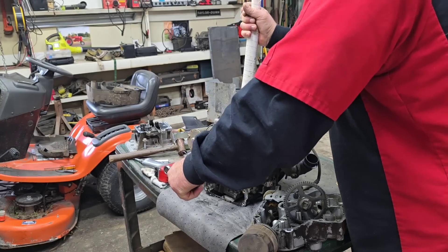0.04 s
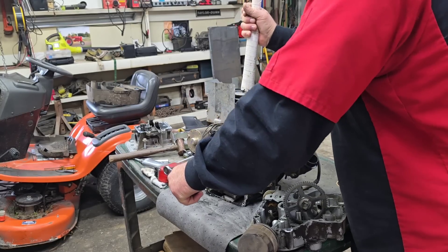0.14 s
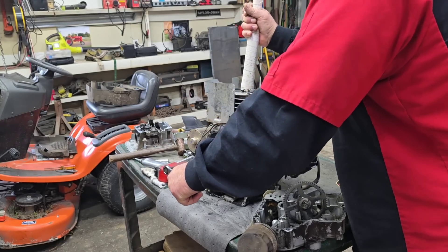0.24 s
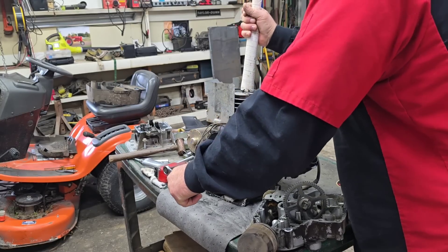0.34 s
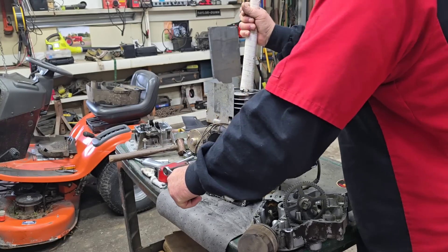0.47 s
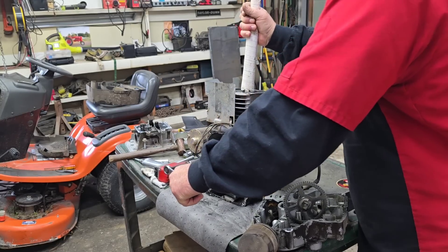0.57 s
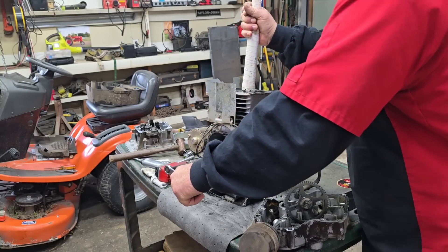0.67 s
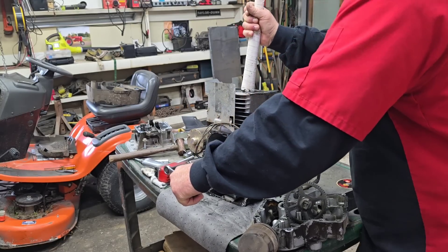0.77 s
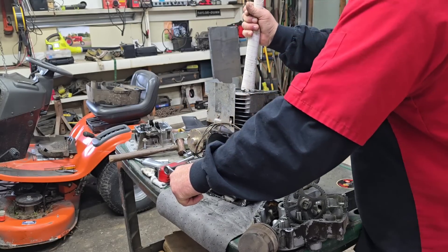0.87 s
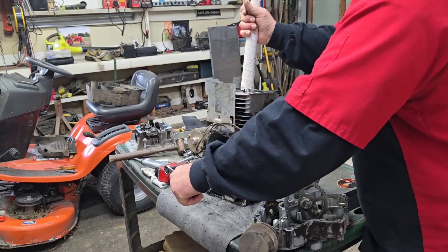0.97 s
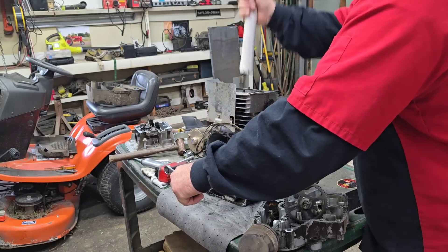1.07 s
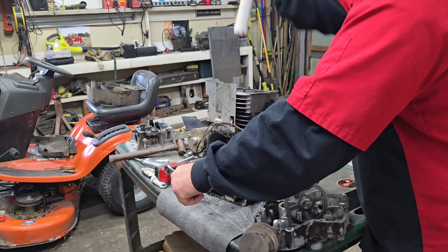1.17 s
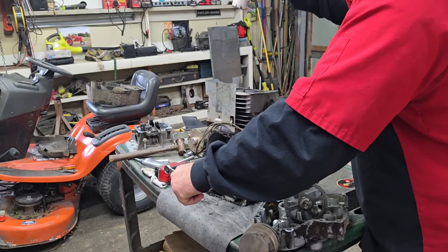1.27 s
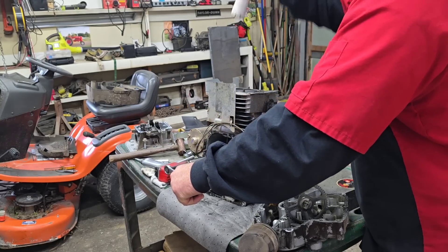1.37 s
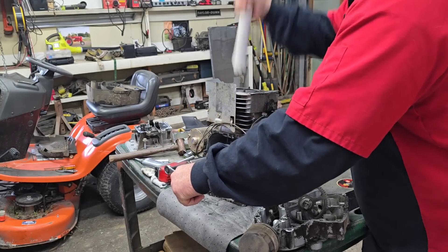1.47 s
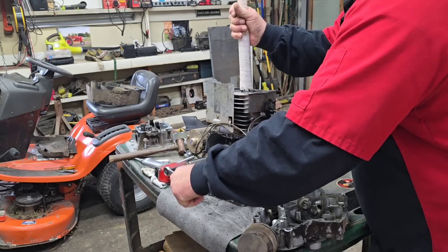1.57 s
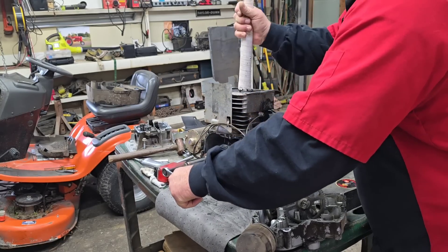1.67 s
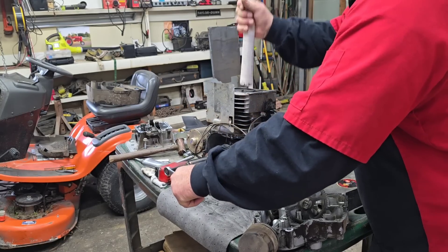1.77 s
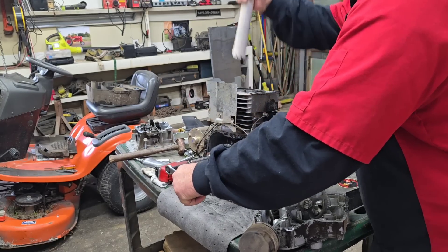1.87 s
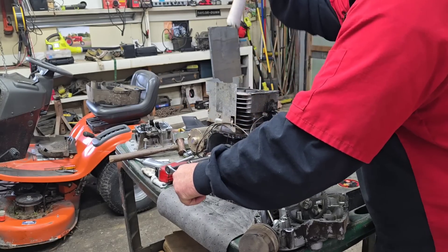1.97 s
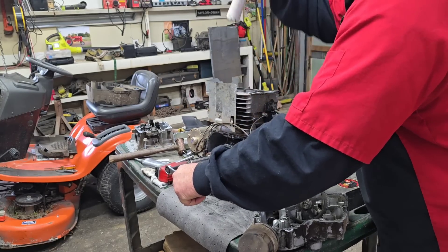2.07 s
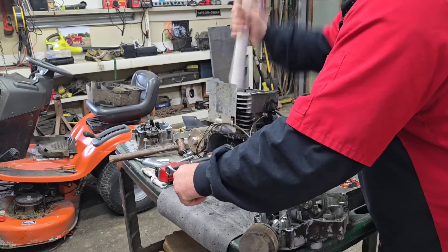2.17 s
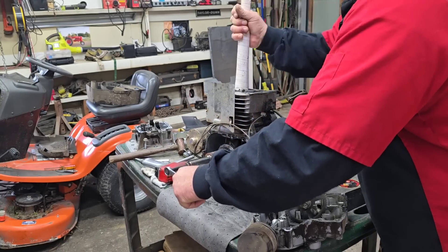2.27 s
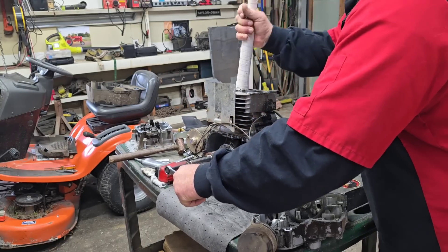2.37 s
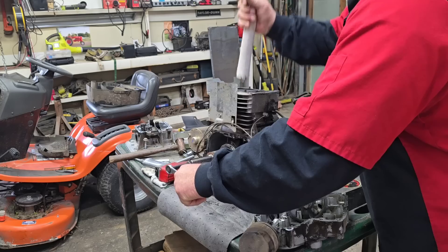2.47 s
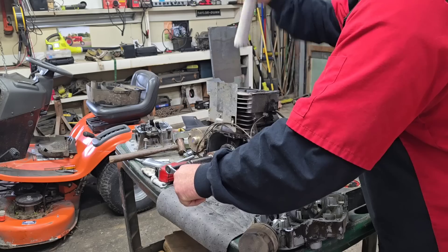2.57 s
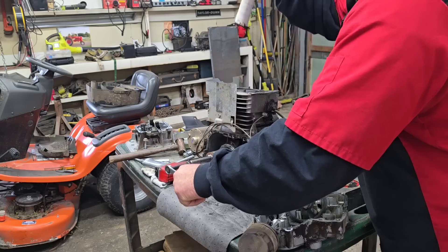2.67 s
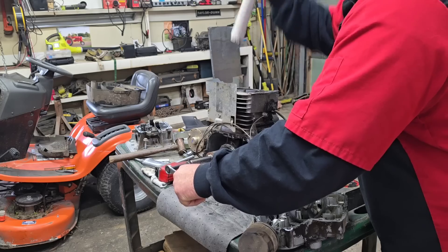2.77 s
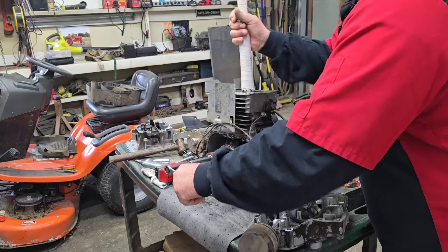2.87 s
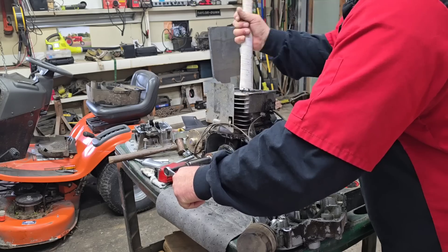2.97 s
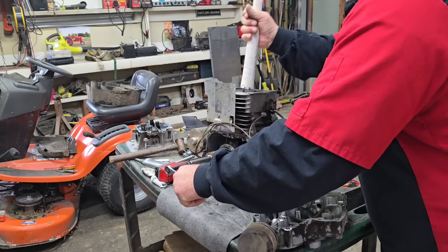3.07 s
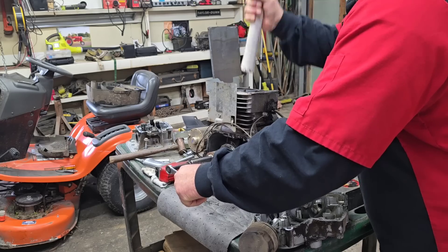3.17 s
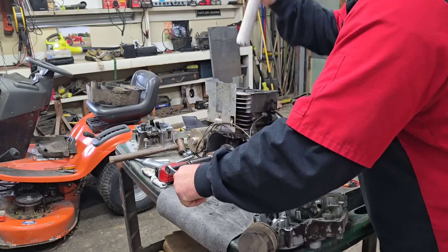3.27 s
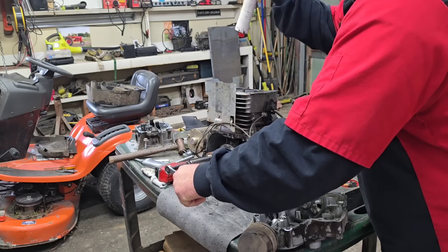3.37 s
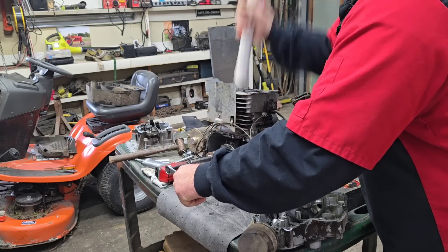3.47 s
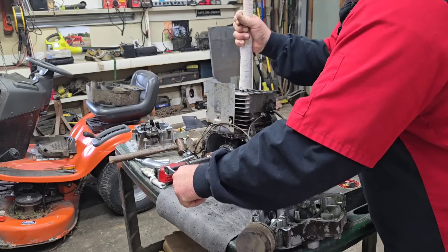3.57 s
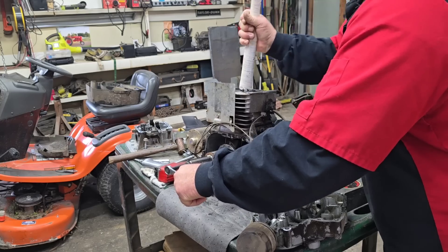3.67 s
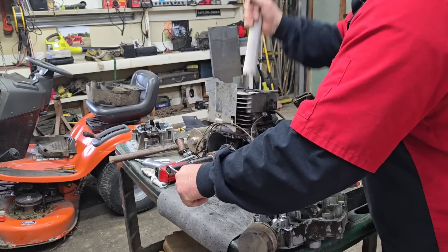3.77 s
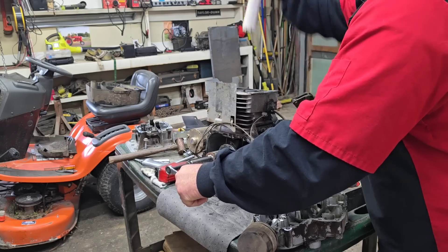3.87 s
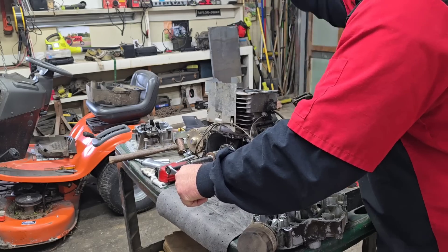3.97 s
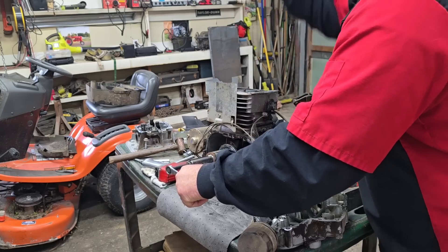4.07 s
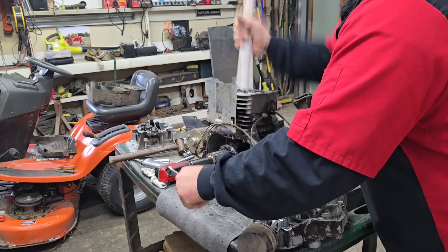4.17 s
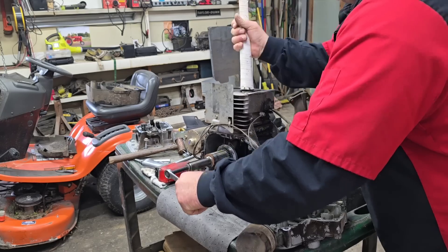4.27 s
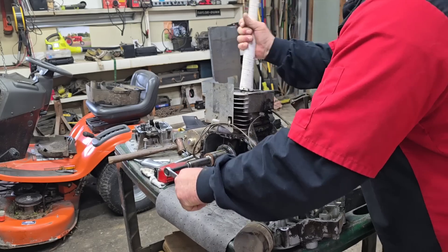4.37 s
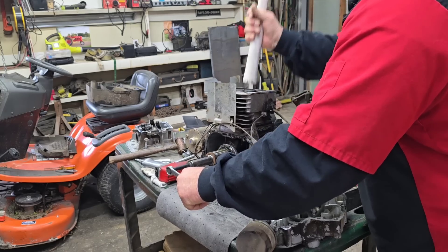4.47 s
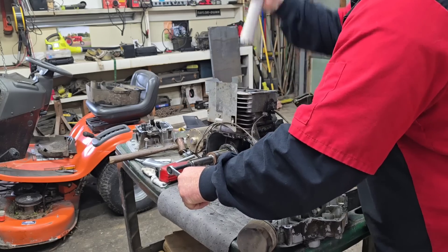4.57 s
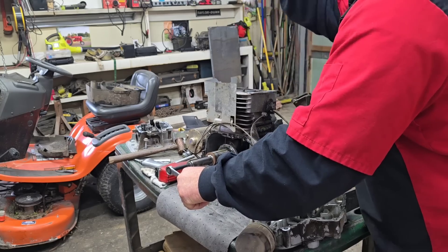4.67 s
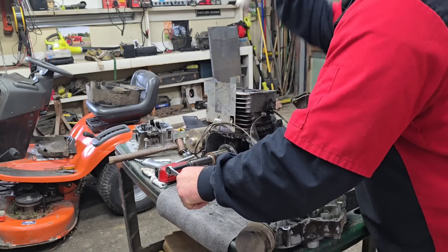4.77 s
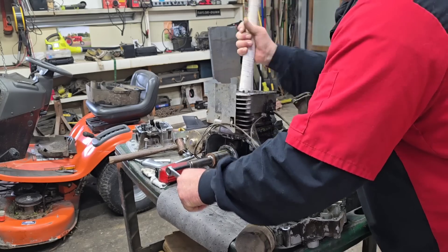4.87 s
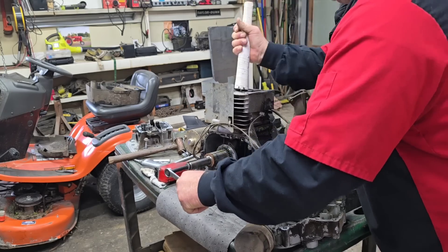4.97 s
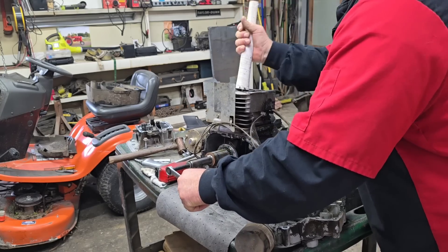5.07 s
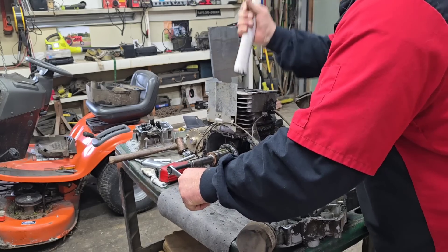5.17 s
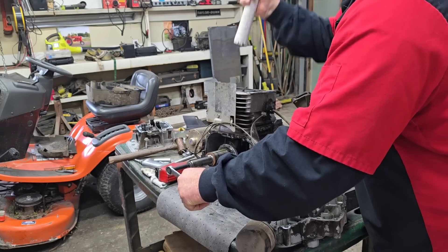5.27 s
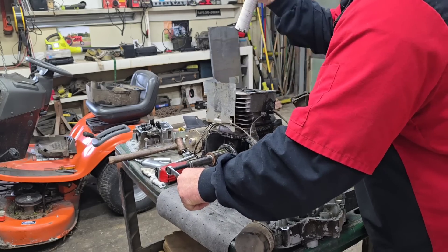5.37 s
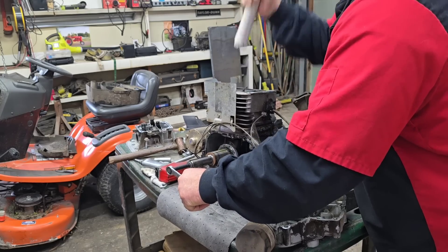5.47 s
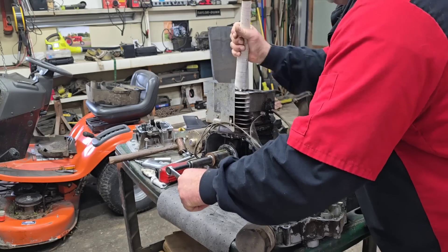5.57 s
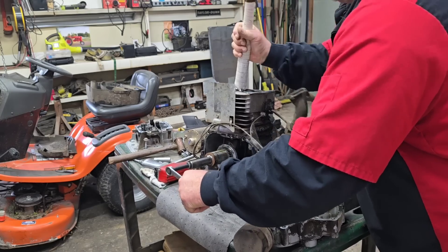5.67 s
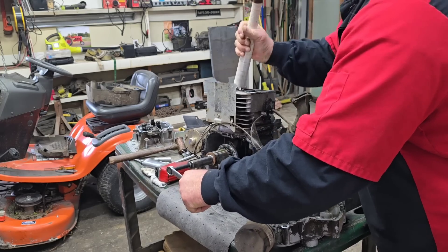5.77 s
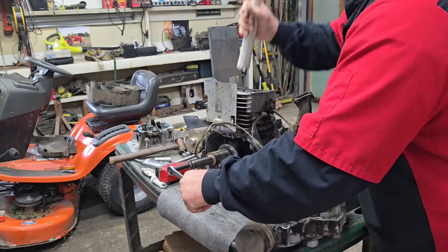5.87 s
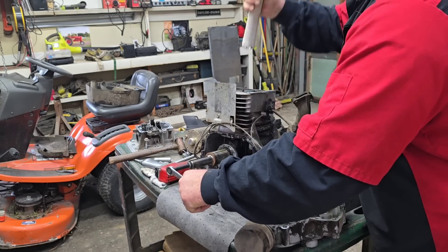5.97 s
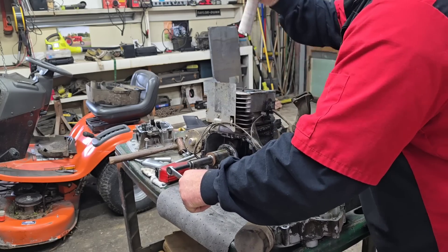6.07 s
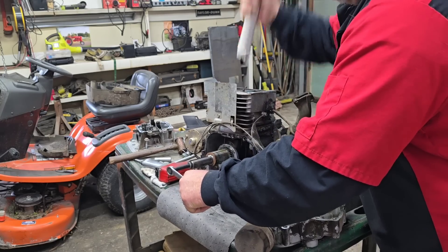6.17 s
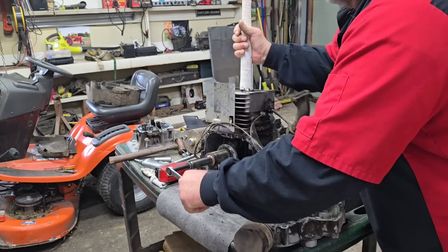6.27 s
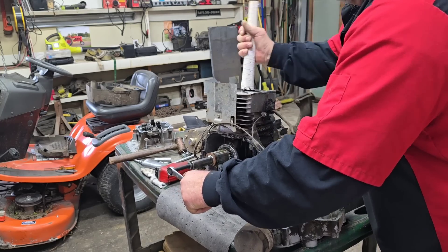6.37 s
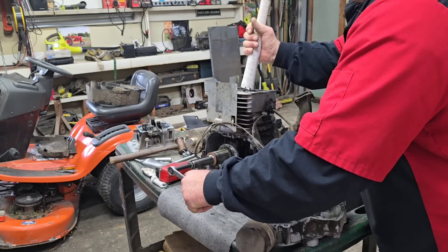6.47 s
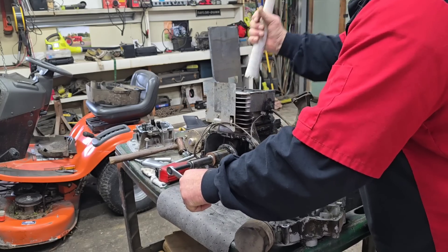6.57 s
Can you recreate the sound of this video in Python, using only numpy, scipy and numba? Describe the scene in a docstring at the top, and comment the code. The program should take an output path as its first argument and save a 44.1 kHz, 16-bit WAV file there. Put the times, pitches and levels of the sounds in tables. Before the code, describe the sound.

Quiet workshop air, cloth movement and a few light taps come first. From about one and a half seconds, eight heavy blows of wood on a finned metal cylinder follow at a steady pace. The first is woodier and duller; later ones clatter with loose parts and piston slap, the last being the most metallic. Small steel clinks and buzzes and muffled engine rocking fill the gaps. The close microphone squashes peaks and trims the room echo.

```python
"""Freeing a stuck piston

A wooden handle is rammed eight times onto the stuck piston of a small engine lying on a workshop bench.
Each blow is a noise crack with its room echo, damped modes of wood, cylinder and bench, and rattling loose parts.
Around the blows the engine rocks in dull thumps, a spanner clinks, small steel parts buzz and a sleeve rustles
as shaped noise; a close microphone's limiter flattens the blows and a noise suppressor shortens their tails."""
import sys
import numpy as np
from scipy import signal
from scipy.fft import rfft, irfft
from scipy.io import wavfile
from scipy.ndimage import uniform_filter1d, minimum_filter1d
from numba import njit

SR = 44100
rng = np.random.default_rng(int(sys.argv[2]) if len(sys.argv) > 2 else 0)


def to_wav(s):
    """Save 16-bit WAV."""
    ch = np.atleast_2d(s).T  # columns
    pcm = np.round(np.clip(ch, -1, 1) * 32767)  # PCM
    wavfile.write(sys.argv[1], SR, pcm.astype(np.int16))


N = 292383
AGE = np.arange(SR) / SR  # time since a hit, s

# blows on the piston; boom, metal and slap are relative to the force:
# (t/s, force/dB, bench boom/dB, ring and chatter of the metal/dB, piston slap/dB, slap delay/s)
BLOWS = [(1.5253, -7, 5.5, -7, -4.5, .012), (2.2100, -8, 8.5, 0, 3.5, 0.0072),
         (2.8665, -8, 6.5, 2.5, 7.5, 0.01), (3.5166, -9, 7, -0.5, 5, .011), (4.1901, -2, 3, 1, 8, 0.024),
         (4.8879, -4, 7.5, -6.5, 8, 0.0041), (5.5587, -11.5, 7, 0.5, 2, 0.014),
         (6.2390, -8, 1, 8, 10, .0033)]
# bench and crankcase, ringing freely: (f/Hz, level/dB, t60/s)
BENCH_MODES = [(79, -18.5, 0.48), (99, -17, 0.17), (129.2, 0.5, 0.37), (151, -8, 0.38), (163, -7.5, 0.41),
               (224.6, 5.5, 0.29), (241.8, 2, 0.26), (260.7, -12, 0.38), (291.8, -2.5, 0.4),
               (320.7, -7.5, 0.42), (348, -0.5, 0.25), (379.8, -4.5, 0.35), (408, -3, 0.26),
               (436.3, -11, 0.35)]


def undb(db):
    """Decibels to gain."""
    return 10 ** (np.asarray(db) / 20)


def fade(t60):
    """Exponential decay that loses 60 dB in t60 seconds."""
    return np.exp(-np.log(1000) * AGE / t60)


def swell(rise_s):
    """Build-up from zero as a vibration spreads."""
    return 1 - np.exp(-AGE / rise_s)


def uneven(depth_db, step_s):
    """Gain that wanders at random from one short step to the next."""
    steps = rng.standard_normal(2048)
    wander = np.interp(AGE / step_s, np.arange(len(steps)), steps)
    return undb(depth_db * wander)


def at_hz(points, hz):
    """Read (f/Hz, value) points on a log-frequency axis."""
    f, value = np.transpose(points)
    return np.interp(np.log(np.maximum(hz, 1)), np.log(f), value)


def noise(spectrum, size=SR):
    """Noise of rms 1 with the given colour."""
    hz = np.fft.rfftfreq(size, 1 / SR)
    white = rfft(rng.standard_normal(size))
    x = irfft(white * undb(at_hz(spectrum, hz)), size)
    return x / x.std()


def cluster(hz, width_hz):
    """Many close modes around one pitch, beating against each other: narrow-band noise of rms 1."""
    f = np.fft.rfftfreq(SR, 1 / SR)
    white = rfft(rng.standard_normal(SR))
    x = irfft(white / (1 + (2 * (f - hz) / width_hz) ** 2), SR)
    return x / x.std()


def ring(modes, detune=0):
    """Damped modes, each with random phase and, if detune is set, slightly random pitch."""
    out = np.zeros(SR)
    for hz, db, t60 in modes:
        pitch_shift, cycles = rng.standard_normal(2)
        tone = np.sin(2 * np.pi * (hz * (1 + detune * pitch_shift) * AGE + cycles))
        out += undb(db) * fade(t60) * tone
    return out


def through(x, resonances):
    """Lift a sound around each (f/Hz, width/Hz, lift/dB) resonance."""
    hz = np.fft.rfftfreq(len(x), 1 / SR)
    power = np.ones(len(hz))
    for centre, width, db in resonances:
        power += (undb(db) ** 2 - 1) / (1 + (2 * (hz - centre) / width) ** 2)
    return irfft(rfft(x) * np.sqrt(power), len(x))


def room(x, build_s):
    """Diffuse echo of the cluttered workshop, of unit energy, each octave band decaying at its own rate."""
    # decay of the workshop: (f/Hz, t60/s)
    room_t60 = [(70, 0.24), (200, 0.4), (450, 0.33), (900, 0.37), (2500, 0.34), (5500, 0.35), (9000, 0.27),
                (15000, 0.15)]
    hz = np.fft.rfftfreq(SR, 1 / SR)
    centres = 62.5 * 2. ** np.arange(9)
    white = rfft(rng.standard_normal(SR))
    tail = np.zeros(SR)
    for centre, share in zip(centres, np.eye(len(centres))):
        band = irfft(white * at_hz(np.c_[centres, share], hz), SR)
        tail += band * fade(at_hz(room_t60, centre))
    tail *= swell(build_s)
    return signal.fftconvolve(x, tail / np.sqrt(np.sum(tail ** 2)))[:len(x)]


def add(track, s, sound):
    """Mix a sound into the track at time s."""
    start = int(s * SR)
    track[start:start + len(sound)] += sound[:N - start]


def shop_air():
    """Steady coloured noise of the workshop air."""
    # air of the workshop: (f/Hz, density/dB)
    air_spectrum = [(25, -35), (60, -11), (110, -8), (220, -3.5), (330, -7), (550, -13.5), (1000, -18.5),
                    (2700, -28.5), (5500, -30.5), (8000, -40.5), (16000, -59)]
    return undb(-55.5) * noise(air_spectrum, size=N)


def sleeve():
    """The arm moves in its sleeve: cloth swishes through air and rubs on cloth, unevenly where it folds."""
    # moves of the arm: (start/s, length/s, level/dB, share of cloth rubbing on cloth 0-1)
    arm_moves = [(0, .24, -48.5, 0.88), (0.219, .22, -45, 0.7), (0.439, .27, -49, 0.16), (.83, 1, -51.5, 0),
                 (1.948, .2, -54, .05), (2.452, 0.22, -51.5, 0.1), (4.445, 0.47, -49.5, 0.09),
                 (5.097, 0.3, -50, 0.18), (6.117, .12, -56, 0.4)]
    # cloth rubbing on cloth: (f/Hz, density/dB)
    rub_spectrum = [(300, -7.5), (700, -3.5), (1050, -7.5), (1400, -0.5), (1900, -7.5), (2450, -6),
                    (3100, -11), (6300, -15.5), (9000, -27.5), (14000, -42.5)]
    # cloth swishing: (f/Hz, density/dB)
    swish_spectrum = [(60, -13.5), (200, -2.5), (350, -8), (600, -15.5), (1000, -16), (2700, -27.5),
                      (5000, -18.5), (8000, -32.5), (16000, -60.5)]
    rise_s, fall_s = 0.036, 0.11
    out = np.zeros(N)
    for s, length_s, db, rub in arm_moves:
        cloth = np.sqrt(rub) * noise(rub_spectrum) + np.sqrt(1 - rub) * noise(swish_spectrum)
        # a move starts and stops softly
        motion = np.clip(np.minimum(AGE / rise_s, 1 - (AGE - length_s) / fall_s), 0, 1)
        folds = uneven(depth_db=2.5, step_s=0.062)
        add(out, s, undb(db) * cloth * motion * folds)
    return out


def steel_pings():
    """Small steel parts buzz around one note when jolted."""
    # buzzing parts: (t/s, f/Hz, width/Hz, level/dB, t60/s)
    pings = [(2.098, 12740, 165.7, -38.5, 0.11), (2.099, 2068, 60.4, -41.5, 0.24),
             (2.183, 2099, 88.1, -37, 0.23), (2.306, 7580, 270, -25, 0.26), (2.870, 6500, 24.73, -27, 0.48),
             (2.873, 7400, 60, -27.5, 0.26), (5.562, 6590, 24.4, -27, 0.54), (6.244, 5340, 200, -0.5, 0.3)]
    out = np.zeros(N)
    for s, hz, width_hz, db, t60 in pings:
        add(out, s, undb(db) * cluster(hz, width_hz) * fade(t60) * swell(0.0024))
    return out


def light_taps():
    """The handle touches the cylinder lightly: soft bursts of dull noise."""
    # light touches: (t/s, level/dB, t60/s)
    taps = [(0.231, -26.5, 0.035), (.570, -30, 0.021), (.828, -39, .4), (2.762, -48, .06),
            (3.935, -44.5, 0.049), (4.778, -37.5, 0.038), (6.011, -38.5, 0.062)]
    # wood on fins: (f/Hz, density/dB)
    tap_spectrum = [(60, -8.5), (250, 1), (550, 0.5), (1000, -6.5), (2500, -14.5), (5500, -15.5),
                    (9000, -36), (15000, -45.5)]
    out = np.zeros(N)
    for s, db, t60 in taps:
        add(out, s, undb(db) * noise(tap_spectrum) * fade(t60) * swell(0.0023))
    return out


def spanner_clinks():
    """The spanner clinks on the crankshaft: a short noise contact coloured by its modes, with their ring."""
    # clinks: (t/s, level/dB, lift of the low modes/dB, top edge f/Hz)
    clinks = [(2.0180, -22.5, -13.5, 8900), (2.0673, -28, -10, 9100), (2.101, -19, 3, 9350),
              (5.056, -3.5, -2, 4000), (5.0800, -11.5, -2.5, 4080)]
    # spanner, before the lift of its low modes: (f/Hz, level/dB, t60/s)
    spanner_modes = [(990, -7.5, 0.038), (1270, -9, 0.091), (1750, -22.5, .12), (2130, -10.5, 0.061),
                     (2480, -13, 0.07), (2870, -19.5, 0.17), (4970, -15.5, 0.12), (4870, -22.5, .22),
                     (5860, -25, 0.1), (6700, -13.5, 0.14), (7930, -13.5, 0.097), (12630, -21.5, .14)]
    # steel touching steel: (f/Hz, density/dB)
    contact_spectrum = [(300, -12), (950, -8), (2100, -0.5), (3000, -2.5), (5200, 4.5), (7500, -9),
                        (10000, -13), (15000, -40.5)]
    out = np.zeros(N)
    for s, db, body_db, edge_hz in clinks:
        modes = [(hz, level + body_db / (1 + (hz / 1500) ** 4), t60) for hz, level, t60 in spanner_modes]
        # while the steel is still in contact its modes are broad
        broad = [(hz, 140, max(level + 18, 0)) for hz, level, _ in modes]
        contact = through(noise(contact_spectrum), broad) * fade(.045)
        clink = undb(-2) * contact + undb(-7.5) * ring(modes, detune=0.00059)
        # each clink has its own top edge: a lower one sounds duller
        top_edge = signal.butter(2, edge_hz, fs=SR, output="sos")
        add(out, s, undb(db) * signal.sosfilt(top_edge, clink))
    return out


def small_contacts():
    """Clinks and taps with their room echo, and the buzzes dry."""
    touches = spanner_clinks() + light_taps()
    return touches + undb(-7.0) * room(touches, build_s=0.0018) + steel_pings()


def thump(t60):
    """The crankcase meets the padded bench dully and sets it humming; one decay damps it all."""
    # crankcase on its padding: (f/Hz, level/dB)
    settle_modes = [(128, -6), (185, -3), (292, -5), (390, -11)]
    # dull impact: (f/Hz, density/dB)
    thump_spectrum = [(30, -29.5), (70, -21), (130, 8), (300, -3), (450, -14), (750, -20), (1500, -42),
                      (6000, -58)]
    settle = sum(undb(db) * np.sin(2 * np.pi * hz * AGE) for hz, db in settle_modes)
    impact = undb(-1) * noise(thump_spectrum)
    hum = undb(-12.5) * ring(BENCH_MODES)
    padding = swell(.004)
    return (settle + impact + hum) * fade(t60) * padding


def rocking(count=3):
    """The engine lands just after every blow; at times, also before the first, it rocks in dying bumps."""
    # rocking to and fro: (t/s, level/dB, loss per bump/dB)
    rocks = [(0.262, -39, 12), (.352, -36.5, 5), (.569, -21, 12.5), (1.858, -23, 3.5), (2.496, -24.5, 2.5),
             (3.125, -31, 16), (4.419, -11.5, 5.5), (4.719, -23.5, 19), (5.164, -26.5, 13.5),
             (5.809, -31, 24)]
    drop_delay_s, drop_db = .094, -5  # landing after the blow, level against its boom
    gap_s, far_side_db = .051, -3.5  # bumps fall on near side, far side and near side again
    out = np.zeros(N)
    for s, force_db, boom_db, *_ in BLOWS:
        add(out, s + drop_delay_s, undb(force_db + boom_db + drop_db) * thump(t60=0.13))
    for s, db, loss_db in rocks:
        for bump in range(count):
            bump_db = db - bump * loss_db + bump % 2 * far_side_db
            add(out, s + bump * gap_s, undb(bump_db) * thump(t60=0.11))
    return out + undb(-22.5) * room(out, build_s=0.0067)


def blows():
    """Each blow cracks, rings wood, cylinder and bench, sets loose parts chattering and slaps the piston."""
    # wooden handle on the piston crown: (f/Hz, level/dB, t60/s)
    wood_modes = [(640, -4, 0.19), (631, 2.5, 0.3), (680, 3.5, 0.31), (689, 3, 0.19), (711, 7.5, 0.29),
                  (741, 3.5, 0.27), (737, -7.5, 0.29)]
    # finned cylinder: (f/Hz, level/dB, t60/s)
    cylinder_modes = [(1555, -6, .40), (1637, -5, .40), (2401, -7, .42), (3957, -10, .40), (4017, -8, .42),
                      (4547, -8, .40), (4653, -12, .40), (5270, -1, .36), (5345, -7, .36), (5477, -5, .36),
                      (5675, -11, .38)]
    # clusters of fin resonances that colour chatter and slap: (f/Hz, width/Hz, lift/dB)
    fin_clusters = [(1550, 57, 10), (2360, 260, 5.5), (3850, 79, 5), (3980, 350, 4.5), (4600, 150, 8.5),
                    (5450, 110, 7.5), (5120, 44, 10), (6900, 48, 2), (7600, 19, 7.5), (8580, 27, 8)]
    # crack of the impact: (f/Hz, density/dB)
    crack_spectrum = [(30, -36.5), (60, -15), (100, -2.5), (200, -4.5), (400, 1.5), (520, 1.5), (720, 4),
                      (900, -5), (1500, -4.5), (2500, -15.5), (5500, -15.5), (8000, -29.5), (15500, -46.5)]
    # loose parts, before the fins: (f/Hz, density/dB)
    chatter_spectrum = [(200, -28), (800, -7.5), (1500, -1.5), (2300, -0.5), (3000, 2), (4600, 0),
                        (6300, 1.5), (8000, -11), (11000, -21), (15500, -32.5)]
    # piston slapping in its bore, before the fins: (f/Hz, density/dB)
    slap_spectrum = [(200, -19), (800, -7), (1500, -3.5), (3000, -2.5), (5500, -0.5), (8000, -8.5),
                     (11000, -11.5), (15500, -20)]
    out = np.zeros(N)
    for s, force_db, boom_db, metal_db, slap_db, slap_delay_s in BLOWS:
        crack = noise(crack_spectrum) * fade(0.048)
        echo = undb(15) * room(crack, build_s=0.01)
        # the heavy bench takes up the motion late
        boom = undb(boom_db) * ring(BENCH_MODES, detune=.006) * swell(0.024)
        knock = undb(-1.5) * ring(wood_modes, detune=.008) * swell(0.0038)
        cylinder = undb(-4.5) * ring(cylinder_modes, detune=.0006) * swell(.008)
        # loose parts rattle in uneven spurts
        rattle = noise(chatter_spectrum) * uneven(depth_db=2, step_s=.004)
        chatter = undb(1) * through(rattle, fin_clusters) * fade(.37) * swell(0.0023)
        metal = undb(metal_db) * (cylinder + chatter)
        add(out, s, undb(force_db) * (undb(3) * crack + echo + boom + knock + metal))
        # a moment later the piston takes up the play of its rod, metal on metal
        slap = through(noise(slap_spectrum), fin_clusters) * fade(0.081) * swell(0.0022)
        add(out, s + slap_delay_s, undb(force_db + slap_db) * slap)
    return out


def scene():
    """Everything at the bench, heard by one microphone."""
    return (shop_air() + sleeve() + small_contacts() + rocking() + blows())[None]


@njit
def follow(x, release):
    """Peak follower: jumps up at once, sinks slowly by the factor release per sample."""
    out, e = np.empty(len(x)), 0.
    for i in range(len(x)):
        e = max(x[i], e * release)
        out[i] = e
    return out


def limiter(x, ceiling_db, release_s):
    """Look-ahead peak limiter: the gain dips smoothly just before each peak."""
    window = 65  # samples, centred
    peak = follow(np.abs(x), np.exp(-1 / (release_s * SR)))
    gain = np.minimum(1, undb(ceiling_db) / (peak + 1e-9))
    return x * uniform_filter1d(minimum_filter1d(gain, window), window)


def suppress(x, depth_db, steepness):
    """Noise suppressor: the further a band sinks below its threshold, the more it is turned down."""
    # level around which a band is turned down: (f/Hz, level/dB relative to full-scale white noise)
    threshold = [(60, -38.5), (250, -25), (700, -34.5), (1500, -33.5), (3000, -40.5), (5500, -36),
                 (8000, -44.5), (15000, -49.5)]
    size = 512
    overlap = size - size // 4
    hz, _, bins = signal.stft(x, SR, nperseg=size, noverlap=overlap)
    # smooth over neighbouring bins, then over time
    power = uniform_filter1d(np.abs(bins) ** 2, size=5, axis=0)
    power = uniform_filter1d(power, size=5, axis=1)
    over = np.maximum(power, 1e-18) * size / undb(at_hz(threshold, hz))[:, None] ** 2
    gain = undb(-depth_db / (1 + over ** steepness))
    return signal.istft(bins * gain, SR, nperseg=size, noverlap=overlap)[1][:N]


def record(dry):
    """The limiter holds blows flat, the suppressor cuts tails short; deep bass and the very top are lost."""
    held = limiter(dry[0], ceiling_db=1.43, release_s=0.054)
    clean = suppress(held, depth_db=13, steepness=1)
    bass_cut = signal.butter(3, 52, "high", fs=SR, output="sos")
    clipped = np.clip(signal.sosfilt(bass_cut, clean), -.96, .96)
    top_cut = signal.ellip(10, .1, 80, 15900, fs=SR, output="sos")
    return signal.sosfilt(top_cut, clipped)[None]


dry = scene()
out = record(dry)
to_wav(out)
```